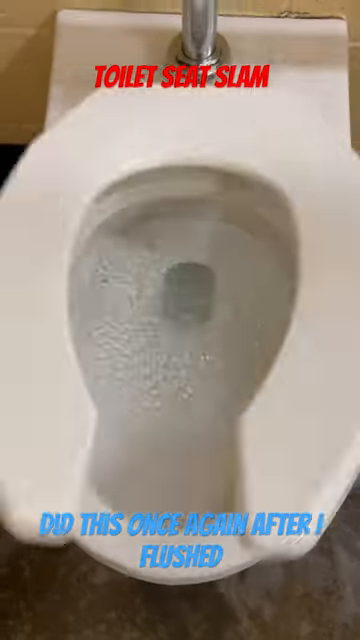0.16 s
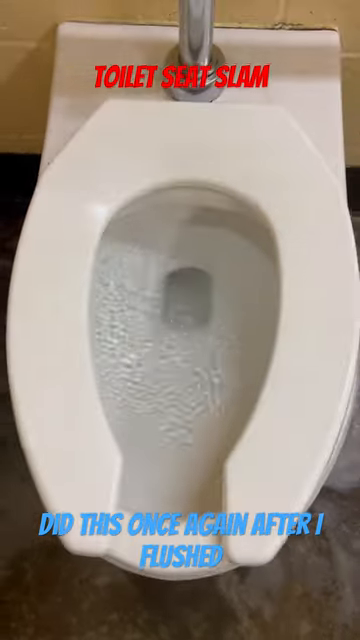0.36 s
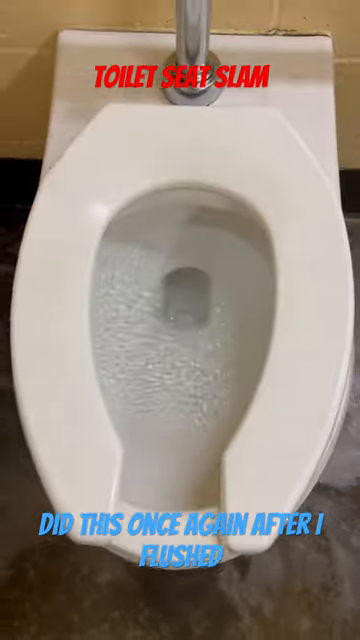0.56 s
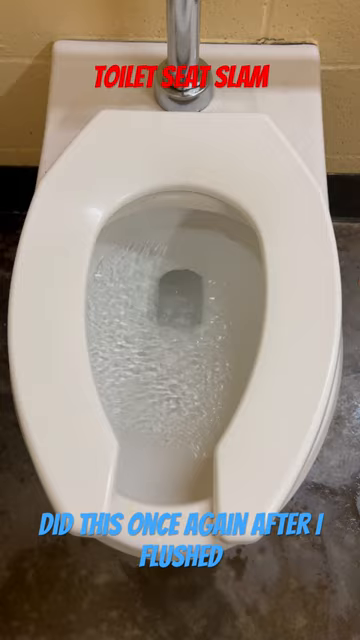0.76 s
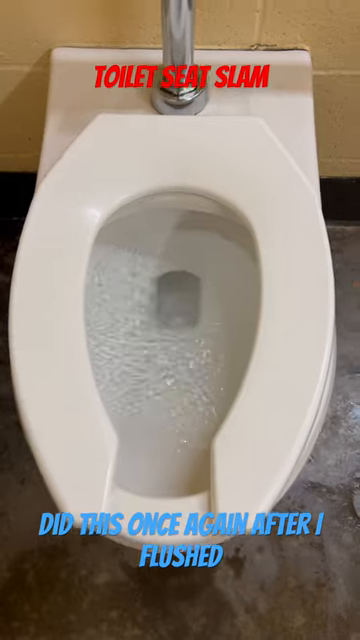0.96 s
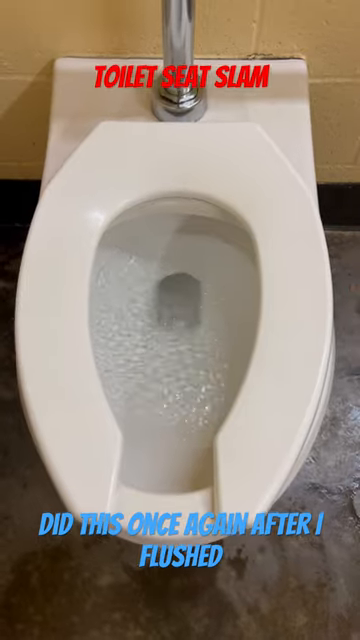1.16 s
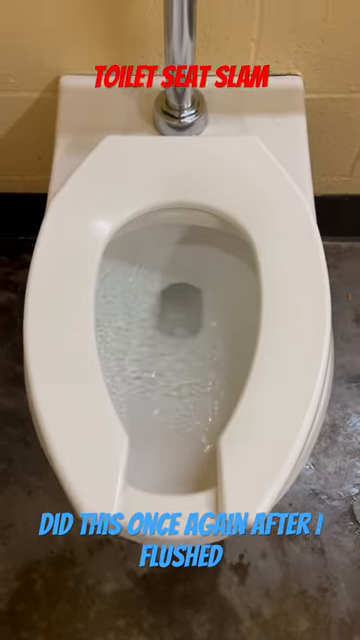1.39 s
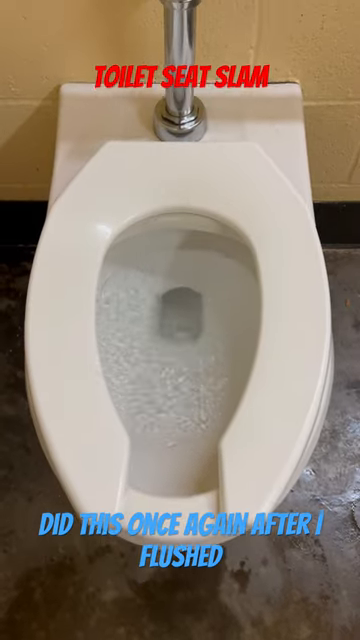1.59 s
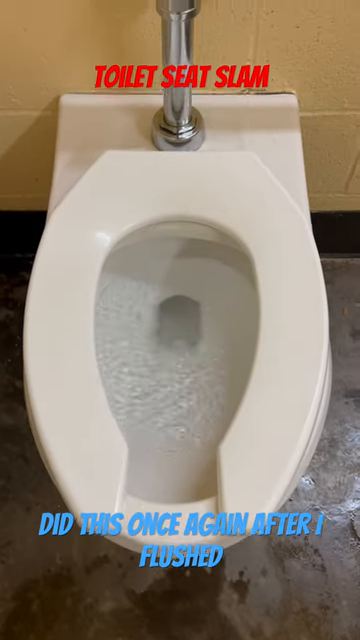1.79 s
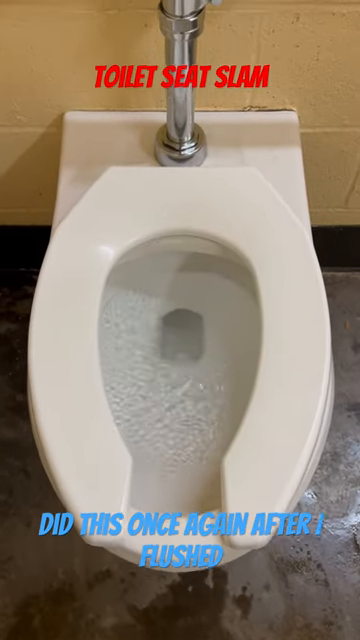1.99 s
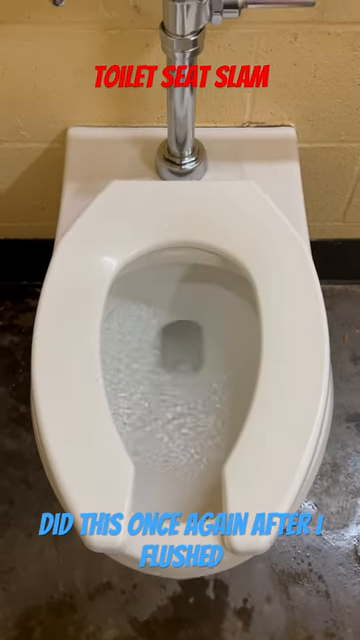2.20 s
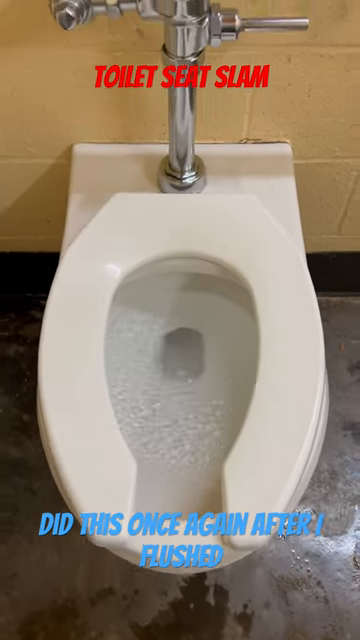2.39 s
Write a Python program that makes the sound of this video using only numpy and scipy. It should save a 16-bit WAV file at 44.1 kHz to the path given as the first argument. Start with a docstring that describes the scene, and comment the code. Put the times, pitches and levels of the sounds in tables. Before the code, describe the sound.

A plastic toilet seat slams onto a porcelain bowl with a sharp bang, echoing in a tiled restroom

```python
"""A plastic toilet seat swings down on a knocking hinge, slams on the porcelain bowl one side after
the other, and bounces twice: noise bursts, damped tones and a low boom, its lows delayed.
The tiled restroom answers with decaying noise, ringing for over a second; the recorder's limiter
ducks at the bang and lets the echo swell back. Ventilation noise and a wavering hum lie beneath;
a faint trickle, ticks and gurgles of water follow as shaped noise and short damped tones."""
import sys
import numpy as np
from scipy import signal
from scipy.fft import rfft, irfft, next_fast_len
from scipy.io import wavfile
from scipy.ndimage import uniform_filter1d, minimum_filter1d, map_coordinates

SR = 44100
rng = np.random.default_rng(int(sys.argv[2]) if len(sys.argv) > 2 else 0)


def digitize_waveform(pressure):
    """Quantize a signal to 16-bit integers and store it at the path in sys.argv[1].

    Rows of a 2-D input are taken as channels; values are limited to [-1, 1].
    """
    field = np.atleast_2d(pressure).T
    bounded = np.clip(field, -1, 1)
    quanta = np.round(bounded * 32767).astype(np.int16)
    wavfile.write(sys.argv[1], SR, quanta)


N = 108045  # length [samples]

# Likeness of the two channels of a noise: (frequency [Hz], correlation [1])
CHANNEL_LIKENESS = [(60, 1), (280, 1), (640, 0.49), (1400, 0.64), (3100, 0.67), (7000, 0.46)]

# Knocks of the hinge: (time [s], level [dB])
HINGE_KNOCKS = [(.074, -40), (.116, -38)]
# Modes of the hinge: (frequency [Hz], relative level [dB], T60 [s])
HINGE_MODES = [(91, 2, 0.63), (225, -7.5, .25), (464.4, -4, .2), (583, -13, 0.31), (1020, 1.5, .14),
               (1400, -23, 0.26)]
# Rumble of the swinging seat: (time [s], relative level [dB])
SWING_LEVEL = [(0, -43.5), (.03, -36.5), (.1, -46), (.135, -35), (.165, -36.5), (.19, -33.5)]
# Spectrum of the swing: (frequency [Hz], relative density [dB per Hz])
SWING_SPECTRUM = [(25, -13.5), (50, -0.5), (85, 6), (150, -22), (225, -4.5), (300, -19.5), (420, -10.5),
                  (800, -27.5), (1300, -33), (3300, -33.5), (5500, -41), (7700, -39), (14000, -68.5)]
SWING_DB, SWING_END_S, SWING_FADE_S = -0.5, 0.22, 0.06
RUSTLE_DB, RUSTLE_ABOVE_HZ = -40, 460  # steady rustle over the rumble

# Spectrum of the ventilation: (frequency [Hz], relative density [dB per Hz])
VENT_SPECTRUM = [(15, -32.5), (25, -12), (52, 0), (95, -5.5), (150, -14), (230, -15), (270, -19),
                 (325, -21), (410, -17), (900, -26), (1400, -30.5), (2700, -32), (4500, -36), (7000, -41.5),
                 (15000, -59.5)]
# Wavering hum: (frequency [Hz], mean level [dB])
HUM_TONES = [(228, -81), (325, -78)]
VENT_DB = -69

# Seat on the rim: (time [s], level [dB], left-right difference [dB], rise [s], crack T60 [s],
# low-pass cutoff [Hz], ring gain [dB], favoured frequency [Hz], echo gain [dB])
SEAT_BLOWS = [(.196, -22.5, -8.5, 0.0055, 0.041, 5060, 5, 705, -4),
              (0.2063, -10, -8.5, .0015, .04, 5430, -7.5, 1047, -9),
              (0.2186, 2.5, 0.5, 0.00024, 0.034, 14200, -7.5, 2000, 1),
              (.3565, -6, -1.5, 0.0018, 0.054, 2770, -8, 2200, -9.5),
              (.366, -13.5, -2, 0.0028, 0.014, 1900, -9.5, 1260, -5),
              (.4205, -13.5, -4.5, 0.0011, 0.058, 3400, -13.5, 2230, -9.5)]
# Spectrum of a crack: (frequency [Hz], relative density [dB per Hz])
CRACK_SPECTRUM = [(60, -23), (150, -17.5), (320, 9), (550, -6.5), (900, 5), (1400, -1), (2200, -1.5),
                  (3000, -8), (4000, -6.5), (6000, -8), (9000, -23), (12000, -24), (16000, -41.5)]
# Damped tones heard in each blow: (frequency [Hz], relative level [dB], T60 [s])
BLOW_TONES = [(161, -10, .13), (328.7, -11, 0.075), (476, -2.5, 0.024), (750, -9, 0.065), (918, -6.5, .06),
              (1015, -4, 0.097), (1214, -4, 0.02), (1369.6, 1.5, 0.14), (1996, -11.5, .1),
              (2063, -0.5, .04), (2497, -6, .07), (2872, -3.5, 0.037), (3770, -2, .05), (3910, -8, 0.1),
              (4970, -17, .09), (5420, -11.5, 0.023), (8000, -21.5, .06)]
FAVOUR_DB, FAVOUR_WIDTH_HZ = 7.5, 220  # the spot struck brings out the tones near one pitch
SETTLE_S, CHOKE_S = 0.2175, 0.0041  # the seat presses flat; earlier blows fade out over CHOKE_S

# Reverberation time: (frequency [Hz], T60 [s])
ROOM_T60 = [(50, 1.3), (115, 2.21), (260, 0.95), (700, 1.253), (1400, 1.232), (3000, 1.175), (5000, 1.015),
            (8000, 0.78), (13000, 0.22)]
# Spectrum of the echo: (frequency [Hz], relative density [dB per Hz])
ROOM_SPECTRUM = [(40, -21), (80, -11.5), (140, -21), (200, -10), (320, 3.5), (500, -4), (750, -2.5),
                 (1200, -4), (2200, 1), (3100, 0), (3500, -3), (4200, -2), (5100, -12), (5900, -8),
                 (8500, -15), (11000, -24.5), (15000, -36)]
# Resonances that stand out of the echo: (frequency [Hz], width [Hz], gain [dB])
LINGERING_RESONANCES = [(340, 18, 0), (661, 25, 9), (1020, 47, 9.5), (1414, 52, 12.5), (1707, 24, 3.5),
                        (2050, 25, 4), (2824, 59, 5), (3890, 58, 3.5), (5790, 38, 5)]
ROOM_DB, ROOM_BUILD_S = -12.5, 0.008
RIPPLE_DB, RIPPLE_HZ = 1.5, 14  # depth and spacing of random ripple in each echo's spectrum

THUMP_S, THUMP_DB, THUMP_LENGTH_S = 0.21, -14.5, 0.05
# the recorder's high-pass delays the lows: frequency at the start, limit, time constant of the approach
THUMP_HZ, THUMP_END_HZ, THUMP_DELAY_S = 178, 50, 0.019

# Water running into the bowl: (time [s], mean level [dB])
TRICKLE_LEVEL = [(1.85, -100), (2.0, -79.5), (2.119, -80), (2.25, -82.5), (2.45, -80.5)]
# Spectrum of the trickle: (frequency [Hz], relative density [dB per Hz])
TRICKLE_SPECTRUM = [(200, -20), (600, 1), (1400, -4.5), (2200, 0), (2750, -1), (3200, -8), (4500, -6),
                    (6000, -26), (12000, -33)]
# Faint water ticks: (time [s], level [dB])
WATER_TICKS = [(1.953, -70), (1.988, -72), (2.272, -67)]
# Spectrum of a tick: (frequency [Hz], relative density [dB per Hz])
TICK_SPECTRUM = [(300, -23), (1200, 0), (4300, -4), (7000, 0.5), (11000, -8), (15000, 1)]
# Soft gurgles: (time [s], frequency [Hz], level [dB])
GURGLES = [(1.82, 1042, -73), (1.892, 336, -61), (1.94, 1030, -68.5), (2.09, 614, -68), (2.11, 2700, -74),
           (2.19, 612, -69), (2.29, 1040, -75)]
TICK_RISE_S, TICK_T60_S = 0.00056, 0.16
GURGLE_RISE_S, GURGLE_T60_S = 0.0045, 0.19

LIMIT_DB, DETECT_S, ATTACK_S = -7.5, 0.0015, 0.0012
HOLD_S, RELEASE_DB_PER_S = 0.18, 45
CEILING, TOP_HZ = 0.9, 16300
LEFT_LAG_S = 0.00002  # sound reaches the left microphone a little later


def amp(db):
    """Level to amplitude: 20 dB for each factor of ten."""
    return 10 ** (np.asarray(db) / 20)


def unit(x):
    """Normalisation by power: scale to rms 1."""
    return x / np.sqrt(np.mean(x ** 2) + 1e-20)


def along(points, hz):
    """Interpolation of (frequency, value) points on a logarithmic frequency axis."""
    f, v = np.transpose(points)
    return np.interp(np.log(hz + 1), np.log(f + 1), v)


def filtered(x, response):
    """Linear filtering: multiply the spectrum by a response of frequency."""
    m = next_fast_len(N + 8192)
    hz = np.fft.rfftfreq(m, 1 / SR)
    return irfft(rfft(x, m) * response(hz), m)[..., :N]


def wobble(rate):
    """Slow random modulation: a smooth curve through `rate` random knots a second."""
    knots = rng.standard_normal(int(N * rate / SR) + 4)
    return map_coordinates(knots, [np.arange(N) * rate / SR])


def stereo_noise(spectrum):
    """Partial coherence: mid and side noises mix to rms 1, nearly mono in the bass."""
    def mid_side_response(hz):
        angle = np.arccos(np.clip(along(CHANNEL_LIKENESS, hz), -1, 1)) / 2
        return amp(along(spectrum, hz)) * [np.cos(angle), np.sin(angle)]

    mid, side = filtered(rng.standard_normal((2, N)), mid_side_response)
    return unit(np.array([mid + side, mid - side]))


def fade(rise_s, t60):
    """Transient envelope: a quick rise and an exponential decay of 60 dB per T60."""
    t = np.arange(N) / SR
    return (1 - np.exp(-t / max(rise_s, 1e-5))) * amp(-60 * t / t60)


def ring(tones, rise_s, spread):
    """Superposition of damped sines, each out of phase between channels by twice `spread` [rad]."""
    t = np.arange(SR // 2) / SR  # the sum is cut after half a second
    ear = np.array([[1], [-1]])
    total = np.zeros((2, len(t)))
    for hz, db, t60 in tones:
        phase = 2 * np.pi * (hz * t + rng.random())
        offset = spread * rng.choice([-1, 1]) * ear
        total += amp(db - 60 * t / t60) * np.sin(phase + offset)
    return np.pad(total * (1 - np.exp(-t / rise_s)), ((0, 0), (0, N - len(t))))


def add(track, s, sound):
    """Superposition: mix a sound in from time s."""
    i = max(round(s * SR), 0)
    track[:, i:] += sound[:, :N - i]


def hinge():
    """Friction and modal excitation: the falling seat rumbles, rustles and knocks until it lands."""
    out, t = np.zeros((2, N)), np.arange(N) / SR
    for s, db in HINGE_KNOCKS:
        add(out, s, amp(db) * ring(HINGE_MODES, rise_s=0.0025, spread=0.16))
    swing = stereo_noise(SWING_SPECTRUM)
    rustle = filtered(swing, lambda hz: hz > RUSTLE_ABOVE_HZ)
    rumble_db = SWING_DB + np.interp(t, *np.transpose(SWING_LEVEL))
    rumble = amp(rumble_db) * (swing - rustle)
    landing = np.clip((SWING_END_S - t) / SWING_FADE_S, 0, 1)
    return out + (rumble + amp(RUSTLE_DB) * rustle) * landing


def background():
    """Stationary noise and tones: ventilation rumble with a hum wavering in level and phase."""
    t = np.arange(N) / SR
    out = amp(VENT_DB + 1.5 * wobble(9)) * stereo_noise(VENT_SPECTRUM)
    for hz, db in HUM_TONES:
        level = amp(db + 3 * wobble(4))
        out = out + level * np.sin(2 * np.pi * hz * t + wobble(6.7))
    return out


def seat():
    """Impact excitation: each blow cracks and rings the tones its spot favours, under its own low-pass."""
    out, t = np.zeros((2, N)), np.arange(N) / SR
    for s, db, pan_db, rise_s, t60, cutoff_hz, ring_db, favoured_hz, _ in SEAT_BLOWS:
        tones = []
        for hz, level_db, life in BLOW_TONES:
            favour_db = FAVOUR_DB * np.exp(-((hz - favoured_hz) / FAVOUR_WIDTH_HZ) ** 2)
            tones.append((hz, level_db + favour_db, life))
        crack = stereo_noise(CRACK_SPECTRUM) * fade(rise_s, t60)
        blow = crack + amp(ring_db) * ring(tones, rise_s, spread=0.4)
        low_pass = signal.butter(4, min(cutoff_hz, SR / 2 - 100), fs=SR, output="sos")
        blow = signal.sosfilt(low_pass, blow)
        if s < SETTLE_S:
            blow = blow * np.clip((SETTLE_S - s - t) / CHOKE_S, 0, 1)
        add(out, s, blow * amp(db + pan_db * np.array([[0.5], [-0.5]])))
    return out


def resonances(hz):
    """Resonant response: fixed lingering peaks, plus random spectral ripple drawn anew at each call."""
    ripple_db = RIPPLE_DB * map_coordinates(rng.standard_normal(N), [hz / RIPPLE_HZ])
    peaks_db = sum(db / (1 + (2 * (hz - f) / width) ** 2) for f, width, db in LINGERING_RESONANCES)
    return amp(ripple_db + peaks_db)


def restroom():
    """Reverberation: every blow raises a dense echo off the tiles, decaying by T60 in each band."""
    out = np.zeros((2, N))
    build = 1 - np.exp(-np.arange(N) / SR / ROOM_BUILD_S)
    for s, db, *_, echo_db in SEAT_BLOWS:
        noise = filtered(stereo_noise(ROOM_SPECTRUM), resonances)
        hz, t, bands = signal.stft(noise, SR, nperseg=512)
        decay = amp(-60 * t / along(ROOM_T60, hz)[:, None])
        tail = signal.istft(bands * decay, SR, nperseg=512)[1][:, :N]
        add(out, s, amp(db + echo_db + ROOM_DB) * build * tail)
    return out


def thump():
    """Group delay: the low boom of the landing, its lows delayed by the recorder's high-pass."""
    t = np.maximum(np.arange(N) / SR - THUMP_S, 0)
    hz = THUMP_END_HZ + (THUMP_HZ - THUMP_END_HZ) * np.exp(-t / THUMP_DELAY_S)  # lows come later
    swell = np.sin(np.pi * np.minimum(t / THUMP_LENGTH_S, 1)) ** 2
    return amp(THUMP_DB) * swell * np.sin(2 * np.pi * np.cumsum(hz * (t > 0)) / SR)


def water():
    """Flow noise and damped oscillation: a faint trickle into the bowl, with small ticks and gurgles."""
    level_db = np.interp(np.arange(N) / SR, *np.transpose(TRICKLE_LEVEL))
    out = amp(level_db + 1.5 * wobble(40)) * stereo_noise(TRICKLE_SPECTRUM)
    for s, db in WATER_TICKS:
        add(out, s, amp(db) * stereo_noise(TICK_SPECTRUM) * fade(TICK_RISE_S, TICK_T60_S))
    for s, hz, db in GURGLES:
        add(out, s, ring([(hz, db, GURGLE_T60_S)], GURGLE_RISE_S, spread=0.24))
    return out


def scene():
    """Superposition of the slam close by, its echo, and the quiet room."""
    return seat() + thump() + restroom() + hinge() + background() + water()


def record(dry):
    """Dynamic limiting: quick ducking, hold and slow recovery, then rounded peaks and a limited band."""
    power = np.abs(uniform_filter1d(np.mean(dry ** 2, axis=0), max(int(DETECT_S * SR), 1)))
    need_db = np.minimum(LIMIT_DB - 10 * np.log10(power + 1e-12), 0)
    half = max(int(HOLD_S * SR / 2), 1)
    held_db = minimum_filter1d(need_db, 2 * half + 1, origin=half)  # lowest gain over the past HOLD_S
    recovery_db = RELEASE_DB_PER_S * np.arange(N) / SR
    gain_db = np.minimum.accumulate(held_db - recovery_db) + recovery_db
    keep = np.exp(-1 / (ATTACK_S * SR))
    y = dry * amp(signal.lfilter([1 - keep], [1, -keep], gain_db))
    y = y / (1 + np.abs(y / CEILING) ** 6) ** (1 / 6)
    ear = np.array([[-1], [1]])  # half the lag delays the left, half advances the right
    return filtered(y, lambda hz: (hz < TOP_HZ) * np.exp(1j * np.pi * hz * LEFT_LAG_S * ear))


dry = scene()
out = record(dry)
digitize_waveform(out)
```